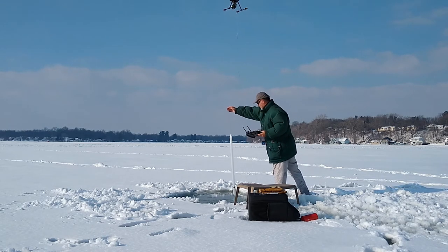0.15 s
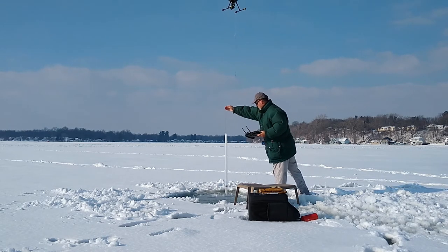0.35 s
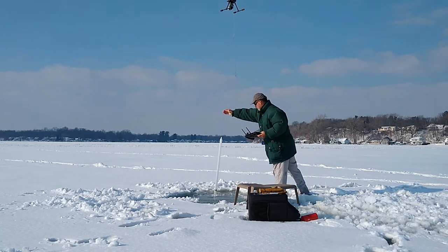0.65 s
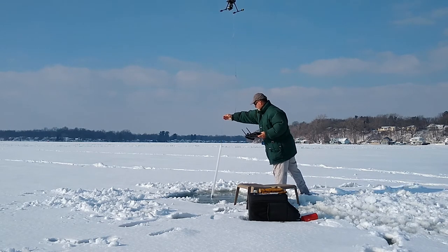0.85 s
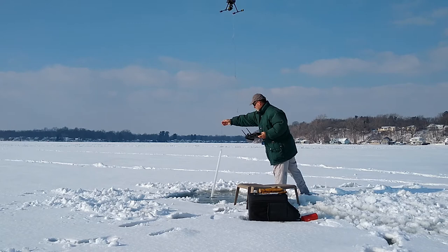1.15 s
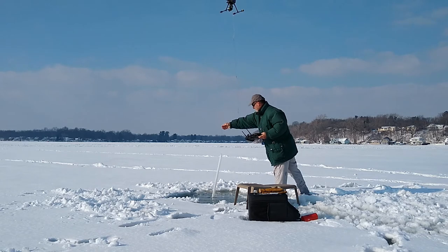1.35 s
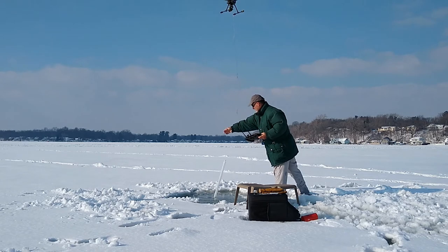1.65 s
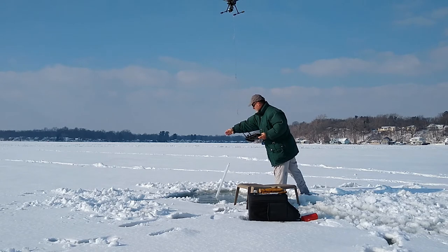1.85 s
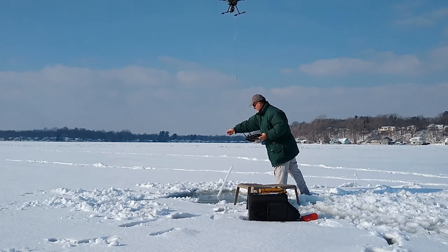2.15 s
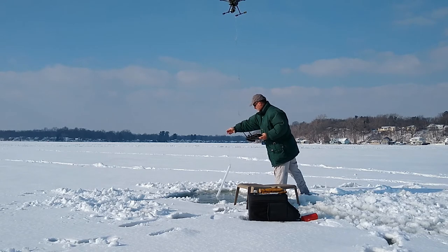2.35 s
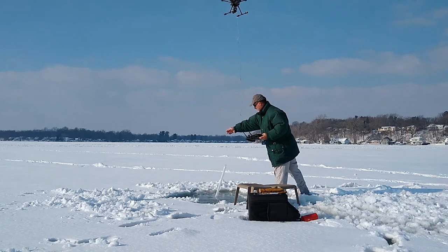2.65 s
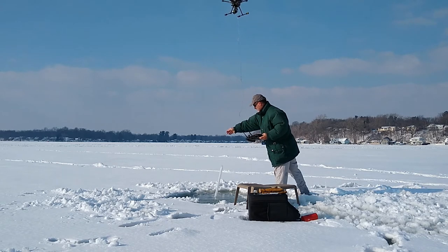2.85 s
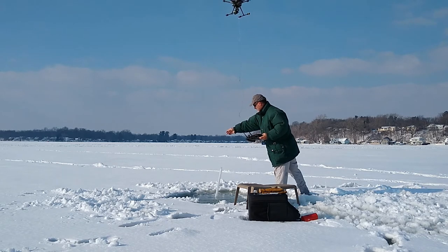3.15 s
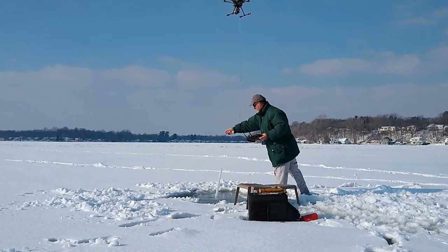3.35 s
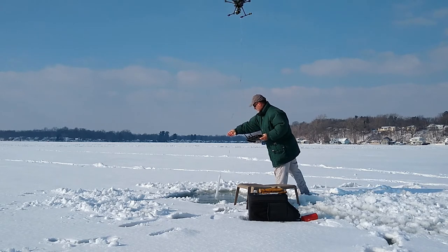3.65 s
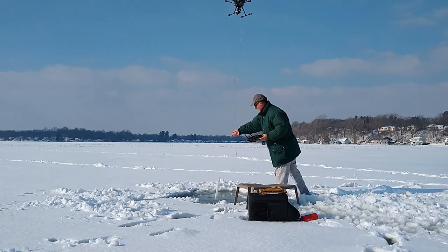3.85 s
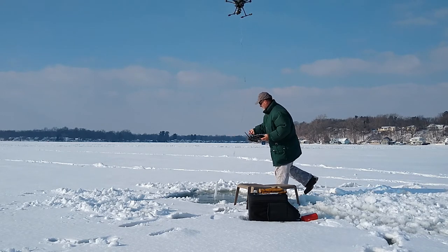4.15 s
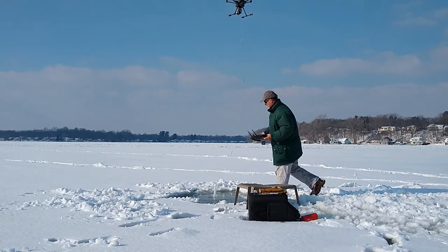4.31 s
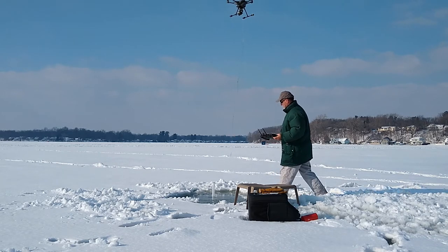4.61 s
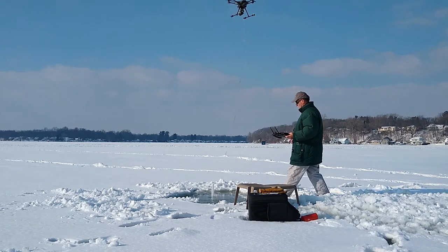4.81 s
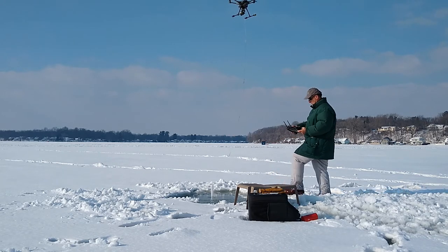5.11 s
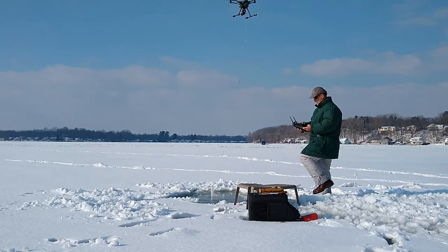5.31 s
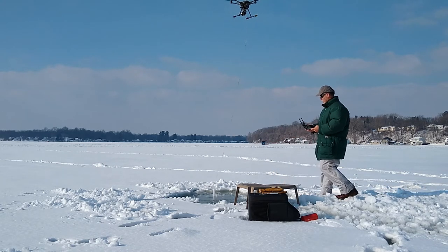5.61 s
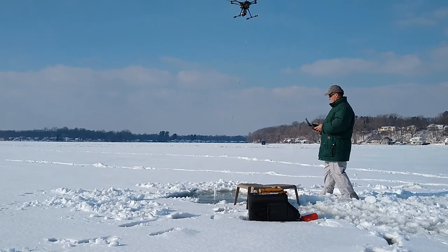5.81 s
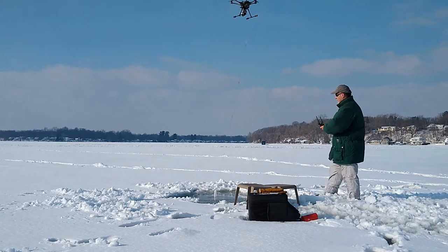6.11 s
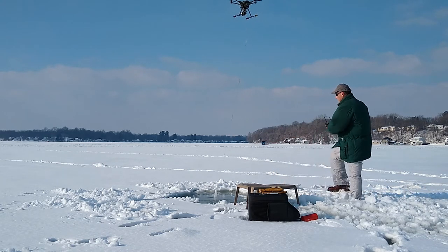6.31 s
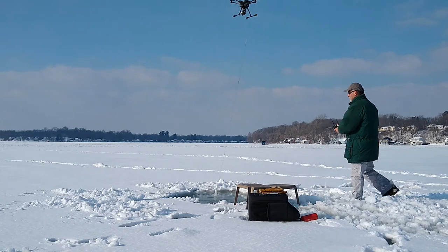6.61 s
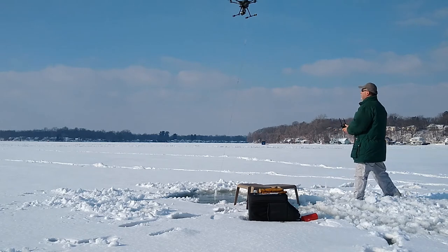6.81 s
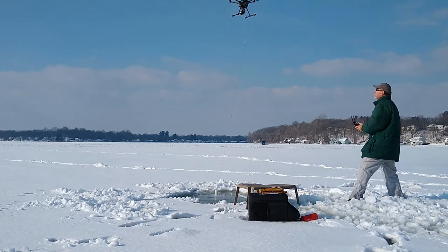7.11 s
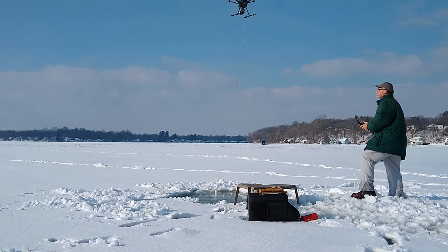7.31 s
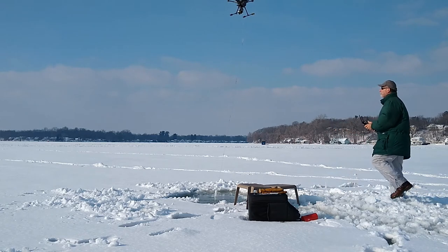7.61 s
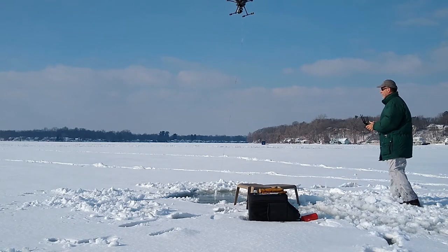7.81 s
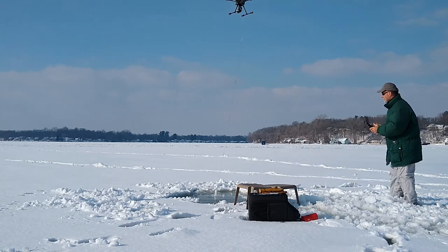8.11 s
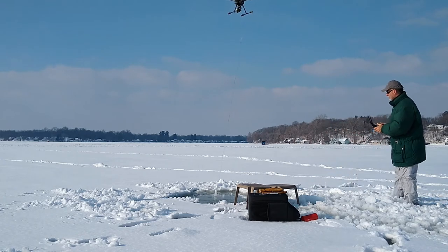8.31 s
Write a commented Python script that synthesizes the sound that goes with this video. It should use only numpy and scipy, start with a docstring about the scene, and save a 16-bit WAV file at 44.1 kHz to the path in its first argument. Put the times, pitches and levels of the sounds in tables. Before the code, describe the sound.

Heavy wind buffeting pounds the right channel over a drone's continuous airy rotor rush, soft hum and thin motor whine above open ice.

```python
"""A frozen lake: a four-rotor drone hovers a few metres up, a small camera stands low on the snow.
Blades sound as wavering harmonics and pulsed noise; motors whine at high multiples of the blade rate.
The ice sends it all back about 2 ms late, which combs the sound; a thin high whistle lies on top.
Shaped noise and short pressure swings make a stiff wind, which buffets the exposed right microphone
and only brushes the sheltered left one. The camera adds steady hiss of its own."""
import sys
import numpy as np
from scipy import signal
from scipy.fft import rfft, irfft, next_fast_len
from scipy.io import wavfile
from scipy.ndimage import uniform_filter1d, map_coordinates

SR = 44100
rng = np.random.default_rng(int(sys.argv[2]) if len(sys.argv) > 2 else 0)


def gain_from_db(level_db):
    """Turn a decibel level (scalar or array-like) into a linear amplitude factor."""
    decades = np.asarray(level_db, float) / 20
    return 10 ** decades


def dump_mix(stems):
    """Bounce the given channels to the path in sys.argv[1] as a 16-bit WAV at rate SR."""
    frames = np.atleast_2d(stems).T  # one column per channel
    limited = np.clip(frames, -1, 1)  # hard clip at full scale
    pcm = np.round(limited * 32767).astype(np.int16)
    wavfile.write(sys.argv[1], SR, pcm)


N = 373067

# blade rate of each rotor as the flight control holds the hover, one list a rotor: time_s, blade_hz
ROTOR_SPEEDS = [
    [(0, 187), (.39, 185.6), (.72, 187.8), (.85, 186), (1.15, 187.2), (1.3, 186.3), (1.45, 187),
     (1.8, 185.8), (1.95, 187.6), (2.15, 191.5), (2.27, 189), (2.39, 187.3), (2.5, 187.8), (2.7, 185.7),
     (2.82, 186.1), (3.13, 190), (3.28, 188.3), (3.74, 188.1), (3.93, 186.9), (4.09, 190.1), (4.32, 186.4),
     (4.46, 186.8), (4.53, 187.9), (4.8, 189.8), (5.03, 189), (5.17, 187.2), (5.4, 187.9), (5.5, 186),
     (5.62, 189.5), (5.85, 191.2), (6.05, 192.5), (6.14, 194.4), (6.43, 191.6), (6.52, 189.7), (6.6, 191.2),
     (6.94, 192.5), (7.15, 195), (7.32, 193.5), (7.61, 197.2), (7.9, 196.9), (8.05, 195.8), (8.25, 197.7),
     (8.46, 195.8)],
    [(0, 183.6), (.21, 183.1), (.3, 184.7), (.59, 182.8), (.8, 184.3), (1.22, 182.9), (1.55, 182.7),
     (1.64, 183.6), (1.87, 183.1), (2, 183.9), (2.45, 184.2), (2.73, 185), (2.84, 184), (3.16, 184.8),
     (3.38, 183.6), (3.7, 184.8), (3.92, 184.8), (4.1, 183.3), (4.3, 182.8), (4.6, 183.6), (4.72, 184),
     (4.95, 185.3), (5.17, 183.8), (5.32, 184.2), (5.5, 182.8), (5.82, 185.2), (6.05, 184.3), (6.24, 183.5),
     (6.59, 184), (6.75, 183), (6.91, 183.5), (7.19, 184.9), (7.42, 185), (7.55, 186.5), (7.75, 184.3),
     (7.96, 183.2), (8.22, 184.8), (8.46, 183)],
    [(0, 171), (.45, 168), (.7, 170.5), (1.1, 170.2), (1.25, 169.2), (1.5, 171), (1.85, 168.7),
     (2.1, 174.5), (2.4, 171), (2.5, 172.6), (2.75, 170), (3.15, 174), (4.1, 172), (4.8, 175.3), (5.3, 172),
     (5.8, 172.5), (6.25, 174), (6.65, 172), (7.3, 174), (7.7, 175.5), (8.05, 173.5), (8.46, 175.5)],
    [(0, 177.5), (.75, 178), (1.2, 177.3), (1.8, 178), (3.5, 177.3), (3.65, 176), (3.85, 177.3),
     (4.1, 175.7), (4.7, 176.3), (5.2, 176.8), (5.35, 178.5), (5.7, 182), (6.3, 180.5), (6.75, 183),
     (7.4, 183.5), (8, 181), (8.46, 182)],
]
# harmonics of the blades: multiple of the blade rate, then level_db of each of the four rotors
BLADE_HUM = [(2, -66.5, -71.5, -85, -70), (3, -84, -69.5, -66, -74.5), (4, -71, -87, -86, -89),
             (5, -70.5, -73, -64.5, -72.5), (6, -96, -94, -122, -120), (7, -66, -78, -71.5, -67.5),
             (8, -70, -77, -64.5, -68.5), (9, -65.5, -73, -91, -107), (10, -88, -73, -65.5, -69.5),
             (12, -65, -71, -93, -69), (15, -86, -76, -66.5, -68.5), (16, -74.5, -67, -55, -60),
             (19, -72.5, -81.5, -87, -90), (20, -74, -77, -89, -74)]
# motor tones: multiple of the blade rate, then level_db relative to WHINE for each whining motor
MOTOR_ORDERS = [(14, -4, 2.5), (21, -4, -32), (26, -9.5, -19), (28, -1.5, -2)]
# whine of the two faster motors as the craft turns; the slower two are not heard to whine:
# time_s, first_motor_db, second_motor_db
WHINE = [(0, -49, -51), (.55, -49, -51), (.7, -53, -54), (.9, -49, -51), (1.85, -48, -50), (2.15, -50, -50),
         (2.5, -54, -50), (2.8, -47, -52), (3.2, -51, -50), (3.7, -50, -50), (4.2, -51, -50),
         (4.75, -53, -52), (5, -49, -48), (5.55, -50, -50), (5.63, -52, -50), (5.72, -66, -53),
         (5.9, -52, -52), (5.98, -52, -62), (6.06, -64, -47), (6.22, -54, -48), (6.34, -66, -49),
         (6.47, -47, -49), (6.62, -64, -48), (7.3, -62, -48), (7.4, -64, -60), (7.55, -66, -75),
         (7.7, -68, -70), (7.77, -68, -50), (8.25, -68, -50), (8.46, -68, -54)]
# airframe resonances that favour the whine: centre_hz, width_hz (full, at half amplitude), gain_db
FRAME = [(5190, 420, 0), (4910, 280, 3), (4040, 620, -23.5), (2700, 300, -14)]
# spectral shape of the blade hiss: frequency_hz, relative level_db per Hz
BLADE_HISS = [(250, -62), (430, -21), (870, 4), (1350, -4.5), (1750, -4.5), (2200, 0.5), (2650, 7.5),
              (2850, 13), (3200, -16), (3580, 10), (3850, -9), (4250, -34), (4550, -8.5), (4950, 8),
              (5200, 11.5), (5600, -24.5), (6150, -28.5), (6700, -33), (7250, -14.5), (7700, -26),
              (9200, -9), (10200, -46), (14000, -45)]
# rotor wash as the craft tilts and drifts: time_s, hiss_db, upper_gain_db (of the upper hiss, on top)
WASH = [(0, -45.5, -2), (.7, -48, 1.5), (1.4, -46.5, -0.5), (2.1, -50, 4.5), (2.8, -49.5, 2),
        (3.5, -53, 6.5), (4.2, -51.5, -0.5), (4.9, -52, 3.5), (5.6, -52, 2), (6.3, -51, 0.5), (7, -52.5, 4),
        (7.7, -51, -4), (8.1, -47, -1), (8.46, -50.5, 3.5)]
# uneven swelling of each hiss band alone: spread_db, changes per second
PATCHES = (2.6, 10)
# path by way of the ice: time_s, extra_delay_ms
BOUNCE = [(0, 2.33), (3, 2.31), (8.46, 2.29)]
# the bounce at the left, then the right microphone:
# gain, gain of a fainter second round, phase_lead_rad, dulled_above_hz
ICE = [(.93, .12, .25, 3900), (.93, .12, .5, 3000)]
# right microphone against left: frequency_hz, right_louder_db, right_lead_rad
MICROPHONES = [(302, -11.5, 0.092), (970, 2, 0.69), (3040, 5, 0.85), (2930, -17, 0.23), (3600, 8, 0.69),
               (4500, -24, 0.82), (4920, 11, 0.67), (7720, -30.5, 0.6), (9860, -2, 3.1), (10800, 3, 1.4),
               (15600, 16, 3.2)]
# spectral shape of the wind at each microphone: frequency_hz, relative level_db per Hz
WIND_LEFT = [(30, -2), (45, 2), (60, -4), (90, 19), (130, 8), (180, -21), (250, -11), (400, -34),
             (800, -51)]
WIND_RIGHT = [(30, 6), (45, -8), (60, -5), (90, 2.5), (150, 1), (250, -4), (350, -19.5), (500, -16),
              (650, -28.5), (1000, -91), (1500, -51)]
# wind on the exposed microphone, without the thumps: time_s, level_db
GUSTS = [(0, -20), (.26, -25), (.54, -22), (.89, -23), (1.01, -28.5), (1.13, -27), (1.39, -25.5),
         (1.81, -25.5), (1.93, -24), (2.5, -25.5), (3.04, -22.5), (3.23, -25.5), (3.53, -29.5), (3.6, -31),
         (3.77, -28), (4.05, -28.5), (4.41, -25.5), (4.64, -25), (4.75, -30), (4.85, -25), (5.2, -26),
         (5.45, -28.5), (5.8, -23.5), (5.91, -24), (6.17, -26), (6.22, -33.5), (6.46, -28.5), (6.55, -27),
         (7, -28), (7.07, -28), (7.33, -28), (7.42, -32), (7.8, -27.5), (7.96, -31.5), (8.18, -28),
         (8.46, -34)]
# how unevenly the wind rolls: spreads rumble_db, eddies_db, whole_gust_db
ROLL_DB = (1.6, 1.0, .7)
# scattered eddies on the right: scale_hz (the peak lies 1.22 times higher), rate per second,
# relative level_db, spread_db of the single blips
EDDIES = [(116.8, 70, -1, 3), (176, 70, -3, 5.5), (237.6, 60, -5.5, 4), (305.4, 50, -12.5, 10.5),
          (430, 49, -31, 5)]
# strongest eddies on the right: centre_s, peak_db, swing_hz, sign (dip -1, bump 1)
THUMPS = [(0.037, -8, 226, 1), (0.082, -12, 239, -1), (0.174, -13, 183, -1), (0.209, -14, 174, -1),
          (0.288, -12.5, 273, -1), (0.459, -8.5, 245, 1), (0.485, -25, 135, 1), (0.507, -16, 184, -1),
          (0.541, -21, 223, -1), (0.556, -14, 147, 1), (0.588, -9.5, 197, -1), (0.613, -9.5, 185, -1),
          (0.717, -15, 197, -1), (0.837, -10, 233, -1), (0.872, -11.5, 184, -1), (1.037, -10, 223, -1),
          (1.054, -7, 185, -1), (1.09, -9, 220, -1), (1.399, -10.5, 190, -1), (1.534, -14.5, 182, 1),
          (1.659, -16.5, 210, -1), (1.838, -16, 200, -1), (1.924, -9, 176, -1), (1.99, -12.5, 164, -1),
          (2.201, -13.5, 149, 1), (2.24, -10, 220, -1), (2.291, -9.5, 290, -1), (2.426, -11, 174, -1),
          (2.471, -11.5, 128, -1), (2.59, -11, 160, 1), (2.649, -9.5, 204, -1), (2.68, -10, 195, -1),
          (2.777, -14.5, 280, 1), (2.791, -13, 150, -1), (2.869, -13.5, 179, 1), (2.915, -7.5, 225, -1),
          (2.952, -12, 280, 1), (2.973, -12, 182, -1), (3.062, -8, 186, -1), (3.088, -10, 249, -1),
          (3.163, -11.5, 240, 1), (3.281, -11.5, 258, 1), (3.506, -13, 192, 1), (3.732, -15.5, 191, -1),
          (3.753, -11, 201, -1), (3.883, -12, 202, -1), (3.949, -12.5, 160, -1), (4.087, -8.5, 195, -1),
          (4.31, -12, 153, -1), (4.369, -10.5, 190, -1), (4.396, -9.5, 197, -1), (4.418, -9.5, 231, -1),
          (4.446, -13.5, 214, 1), (4.588, -17, 147, -1), (4.673, -13, 200, -1), (4.692, -12.5, 148, 1),
          (4.833, -10, 171, -1), (4.876, -11, 227, 1), (4.9, -15.5, 166, 1), (4.984, -12, 270, 1),
          (5.128, -13.5, 178, -1), (5.201, -10.5, 200, -1), (5.32, -11.5, 167, -1), (5.505, -9.5, 260, -1),
          (5.621, -11, 303, -1), (5.715, -14, 156, -1), (5.888, -9.5, 276, -1), (5.932, -11, 216, 1),
          (5.967, -9, 171, -1), (6.037, -9, 261, -1), (6.365, -12, 175, -1), (6.43, -11.5, 200, -1),
          (6.46, -9, 183, -1), (6.49, -12.5, 195, -1), (6.753, -9.5, 220, -1), (6.843, -15, 236, 1),
          (6.941, -16, 176, -1), (6.972, -13.5, 204, 1), (7.158, -14, 183, -1), (7.226, -14.5, 179, -1),
          (7.337, -11.5, 210, -1), (7.688, -17, 190, -1), (7.809, -12.5, 244, -1), (7.884, -10, 162, -1),
          (8.049, -14, 187, 1), (8.123, -16.5, 279, -1), (8.256, -18, 243, -1), (8.275, -15, 198, -1),
          (8.44, -17.5, 188, -1)]
# gusts that reach round to the sheltered side: centre_s, peak_db, length_s (from centre to 1/e)
SPILLS = [(0, -45, 0.31), (0.454, -40, 0.062), (.8, -54, 0.16), (2, -55, 0.16), (2.7, -51, 0.28),
          (3.05, -48, 0.15), (3.55, -56, .2), (4.15, -51, 0.22), (4.402, -43, 0.2), (5.1, -43, 0.22),
          (5.472, -39, 0.11), (5.893, -45, 0.17), (6.5, -53.5, 0.29), (7.05, -54, 0.065), (7.8, -57, 0.18),
          (8.113, -49, 0.069)]
# broad hiss of the camera: frequency_hz, left_db per Hz, right_db per Hz
SELF_HISS = [(500, -108, -106), (4200, -112, -106), (5700, -116, -107), (9000, -100, -101),
             (9400, -105, -90.5), (12100, -111, -99), (13100, -108, -101), (15100, -116, -116)]
# narrow bands of camera hiss: centre_hz, width_hz (from centre to 1/e), left_db, right_db, right_lead_rad
NARROW_HISS = [(3200, 50, -74, -62.5, .4), (4600, 110, -67, -82, 1.2), (5848, 104, -92, -64.5, 0.39),
               (6600, 280, -94, -69.5, 0.74), (7080, 66, -73, -59, 1.13), (7260, 50, -64.5, -71.5, 0.63),
               (7340, 72, -78, -82, .6), (7600, 60, -71, -83, .5), (8180, 45, -88, -69.5, 0.71),
               (9590, 63, -66, -56.5, 2.28), (14289, 80, -84, -78, 1.5), (15000, 130, -73, -63, .8)]

SPEED_SHAKE, HUM_WAVER_RAD = .0013, .5  # spreads; the shake is a fraction of the blade rate
HUM_DB_PER_HZ = .45  # a rotor hums louder the harder it pulls: for each Hz above its mean blade rate
HUM_FLUTTER_DB, WHINE_FLUTTER_DB = 2.66, 2.2
FRAME_FLOOR_DB = -40  # passed away from the resonances
UPPER_HZ = 2980  # start of the upper hiss
SCATTER_DB = -11  # hiss that differs between the microphones, against the hiss they share
WHISTLE_HZ, WHISTLE_WIDTH_HZ, WHISTLE_DB = 15670, 70, -55.5
FULL_HZ, FADE_DB_PER_HZ = 189.3, 4.5  # the whistle fades below this blade rate
RUMBLE_DB, LEE_DB = -1, -98  # rumble against the eddies; least wind on the sheltered side
THUMP_CYCLES, THUMP_DRAG = 0.64, 1.1  # reach of a swing, stretch of its later half
THUMP_TIP, TIP_CYCLES = 0.24, 0.12  # share and reach of the sharp tip
BASS_CUT_HZ, TOP_HZ = 60, 15830

PADDED = next_fast_len(N)
T = np.arange(N) / SR
HZ = np.arange(PADDED // 2 + 1) * SR / PADDED + 1  # 1 Hz up, to keep clear of zero


def curve(rows):
    """Columns of a table, one value a sample."""
    s, *columns = np.transpose(rows)
    return [np.interp(T, s, c) for c in columns]


def across(rows):
    """Columns of a table, one value a frequency."""
    hz, *columns = np.transpose(rows)
    return [np.interp(np.log(HZ), np.log(hz), c) for c in columns]


def colour(x, gain):
    """Filter by a complex gain per frequency."""
    return irfft(rfft(x, PADDED) * gain, PADDED)[..., :N]


def unit(x):
    """Scale to an rms of 1."""
    return x / np.sqrt(np.mean(x ** 2))


def walk(rate):
    """Random levels held 1 / rate s and slewed twice; spread near 1."""
    hold = int(SR / rate)
    steps = np.repeat(rng.standard_normal(N // hold + 1), hold)
    return 1.496 * uniform_filter1d(uniform_filter1d(steps, hold), hold)[:N]


def narrow(hz, width):
    """Noise in a bell-shaped band, rms of 1."""
    return unit(colour(rng.standard_normal(N), np.exp(-((HZ - hz) / width) ** 2)))


def bell(s, length):
    """A swell centred on s."""
    return np.exp(-((T - s) / length) ** 2)


def frame(hz):
    """Gain of the airframe's resonances at a moving frequency."""
    gain = gain_from_db(FRAME_FLOOR_DB)
    for centre_hz, width, db in FRAME:
        gain = gain + gain_from_db(db) / (1 + (2 * (hz - centre_hz) / width) ** 4)
    return gain


def rotor(which, chop=0.49):
    """Blade hum, motor whine locked to the shaft, and noise that pulses with each blade."""
    hz = curve(ROTOR_SPEEDS[which])[0]
    # the flight control trims the speed many times a second
    turn = 2 * np.pi * (np.cumsum(hz * (1 + SPEED_SHAKE * walk(70))) / SR + rng.random())
    tones = np.zeros(N)
    # gusts load the blades unevenly, so the hum flutters in strength and phase
    pull_db = HUM_DB_PER_HZ * (hz - hz.mean())
    for multiple, *levels_db in BLADE_HUM:
        db = levels_db[which] + pull_db + HUM_FLUTTER_DB * walk(14)
        tones += gain_from_db(db) * np.sin(round(multiple) * (turn + HUM_WAVER_RAD * walk(25)))
    if which < len(WHINE[0]) - 1:
        whine_db = curve(WHINE)[which]
        for multiple, *levels_db in MOTOR_ORDERS:
            db = whine_db + levels_db[which] + WHINE_FLUTTER_DB * walk(30)
            tones += gain_from_db(db) * frame(round(multiple) * hz) * np.sin(round(multiple) * turn)
    rush = (1 + chop * np.cos(turn)) * rng.standard_normal(N)
    return tones, rush


def patchy(noise, count=12):
    """Overlapping bands, each with its own wandering level; the end ones reach past 700 Hz and 6 kHz."""
    place = np.clip(np.log(HZ / 700) / np.log(6000 / 700), 0, 1) * (count - 1)
    spread_db, rate = PATCHES
    out = np.zeros(N)
    for k in range(count):
        band = colour(noise, np.maximum(1 - abs(place - k), 0))
        out += band * gain_from_db(spread_db * walk(rate))
    return out


def wash(noise):
    """Blade hiss; its upper part is more directional and swells on its own."""
    hiss_db, upper_db = curve(WASH)
    hiss = unit(colour(noise, gain_from_db(across(BLADE_HISS)[0])))
    upper = colour(hiss, 1 / (1 + (UPPER_HZ / HZ) ** 12))
    return gain_from_db(hiss_db) * (hiss - upper + gain_from_db(upper_db) * upper)


def whistle():
    """The motor drive's high whistle, a ragged narrow band that swells with the fastest rotor."""
    short_hz = np.maximum(FULL_HZ - curve(ROTOR_SPEEDS[0])[0], 0)
    db = WHISTLE_DB - FADE_DB_PER_HZ * short_hz + 0.82 * walk(7)
    return gain_from_db(db) * narrow(WHISTLE_HZ, WHISTLE_WIDTH_HZ)


def drone():
    """Four rotors at each microphone, straight and again off the ice; delayed copies comb the sound."""
    tones, rush = np.sum([rotor(which) for which in range(len(ROTOR_SPEEDS))], axis=0)
    shared = tones + wash(patchy(rush * gain_from_db(1.13 * walk(20))))
    lag = curve(BOUNCE)[0] * SR / 1000  # samples
    high = whistle()
    louder_db, lead = across(MICROPHONES)
    out = []
    for side, (gain, again, early, dull_hz) in zip((-1, 1), ICE):
        direct = shared + gain_from_db(SCATTER_DB) * wash(rng.standard_normal(N))
        once, twice = (map_coordinates(direct, [np.arange(N) - k * lag], order=3) for k in (1, 2))
        ice = np.exp(1j * early) / np.sqrt(1 + (HZ / dull_hz) ** 4)
        heard = direct + gain * colour(once, ice) + again * colour(twice, ice ** 2) + high
        # the camera body gives the microphones different strength and phase
        out.append(colour(heard, gain_from_db(side * louder_db / 2) * np.exp(side * .5j * lead)))
    return np.array(out)


def buffet(spectrum, flutter_db, rate):
    """Low noise of air rolling over a microphone, rms of 1."""
    rolling = rng.standard_normal(N) * gain_from_db(flutter_db * walk(rate))
    return unit(colour(rolling, gain_from_db(across(spectrum)[0])))


def eddies():
    """Scattered pressure blips of about one cycle, a few much stronger, more often dips than bumps."""
    out = np.zeros(N)
    for hz, rate, db, spread_db in EDDIES:
        arrivals = rng.random(N) < rate / SR
        strength = gain_from_db(spread_db * np.minimum(rng.exponential(size=N), 2))
        kicks = arrivals * strength * np.sign(rng.random(N) - .65)
        shape = (HZ / hz) ** 3 * np.exp(-(HZ / hz) ** 2 + .5j * rng.standard_normal())
        out += gain_from_db(db) * unit(colour(kicks, shape))
    return out


def thumps():
    """Strong eddies: a pointed pressure swing with a rebound on either side, the later one slower."""
    out = np.zeros(N)
    for s, db, hz, sign in THUMPS:
        near = slice(max(int((s - .03) * SR), 0), int((s + .04) * SR))
        phase = (T[near] - s) * hz  # cycles
        phase = np.where(phase > 0, phase / THUMP_DRAG, phase)
        swing = np.exp(-(phase / THUMP_CYCLES) ** 2) * np.cos(2 * np.pi * phase)
        tip = np.exp(-(phase / TIP_CYCLES) ** 2)
        out[near] += np.sign(sign) * gain_from_db(db) * ((1 - THUMP_TIP) * swing + THUMP_TIP * tip)
    return out


def wind():
    """Turbulence at each microphone, unrelated between the two: brief spills left, full gusts right."""
    lee = gain_from_db(LEE_DB) + sum(gain_from_db(db) * bell(s, length) for s, db, length in SPILLS)
    left = lee * buffet(WIND_LEFT, 2.3, 27)
    rumble_db, eddies_db, gust_db = ROLL_DB
    rumble = gain_from_db(RUMBLE_DB) * buffet(WIND_RIGHT, rumble_db, 50)
    exposed = unit(rumble + eddies() * gain_from_db(eddies_db * walk(25)))
    right = gain_from_db(curve(GUSTS)[0] + gust_db * walk(10)) * exposed + thumps()
    return np.array([left, right])


def camera():
    """Broad noise of each channel and a few narrow bands, fixed in pitch, that flutter in level."""
    # sqrt(SR / 2) turns a level per Hz into that of white noise
    broad = [colour(rng.standard_normal(N), gain_from_db(db) * np.sqrt(SR / 2)) for db in across(SELF_HISS)]
    out = np.array(broad)
    for hz, width, left_db, right_db, lead in NARROW_HISS:
        band = narrow(hz, width) * gain_from_db(2.7 * walk(15))
        out += [gain_from_db(left_db) * band, gain_from_db(right_db) * colour(band, np.exp(1j * lead))]
    return out


def scene():
    """Drone, wind and the camera itself, left and right."""
    return drone() + wind() + camera()


def roll_off(x):
    """The treble ends steeply here."""
    return signal.sosfilt(signal.butter(12, 16390, fs=SR, output="sos"), x)


def record(dry):
    """The bass rolls off gently below BASS_CUT_HZ and the sound ends sharply at TOP_HZ."""
    cut = colour(dry, (HZ < TOP_HZ) / np.sqrt(1 + (BASS_CUT_HZ / HZ) ** 6))
    return roll_off(cut)


dry = scene()
out = record(dry)
dump_mix(out)
```